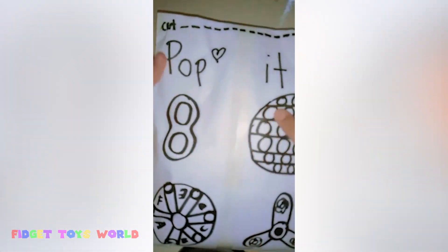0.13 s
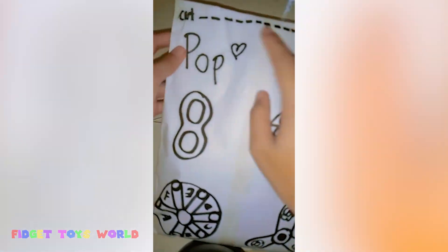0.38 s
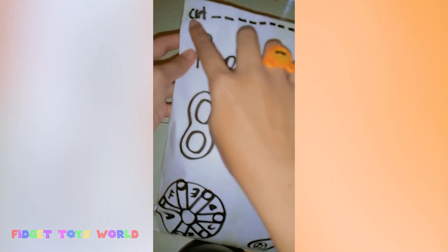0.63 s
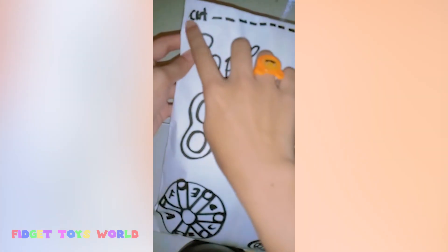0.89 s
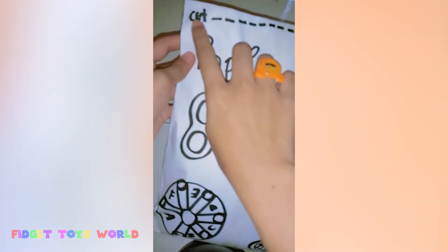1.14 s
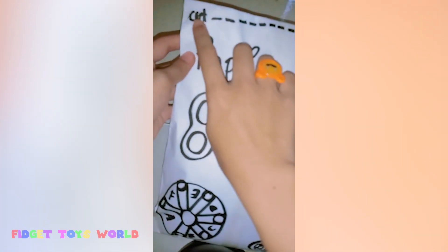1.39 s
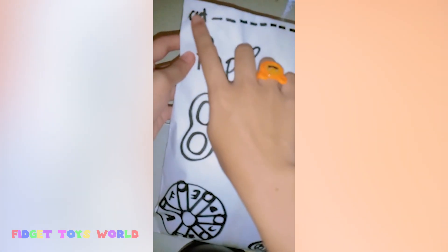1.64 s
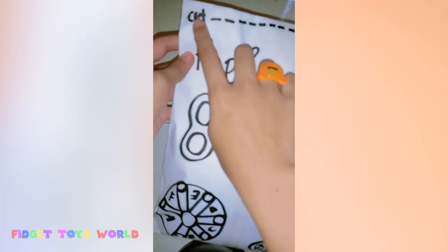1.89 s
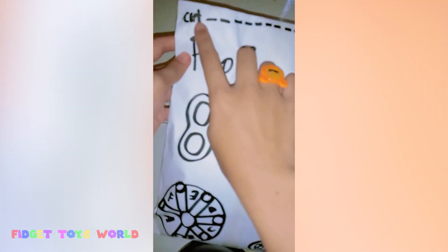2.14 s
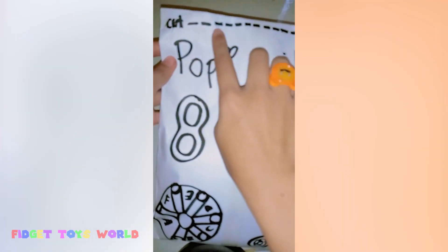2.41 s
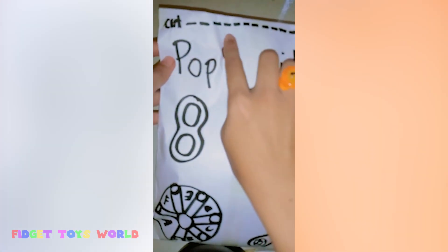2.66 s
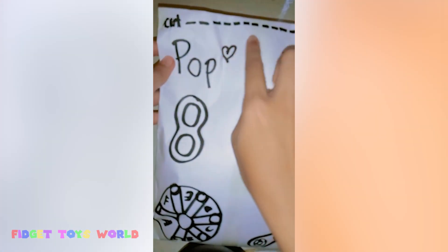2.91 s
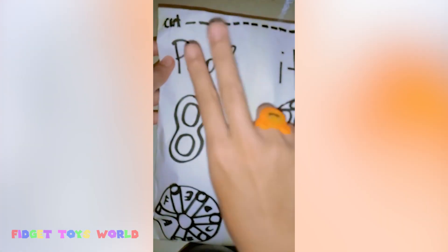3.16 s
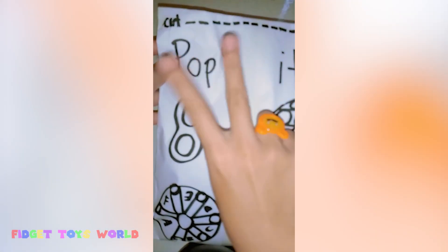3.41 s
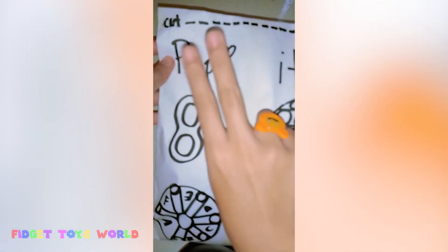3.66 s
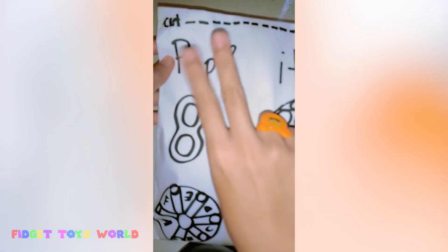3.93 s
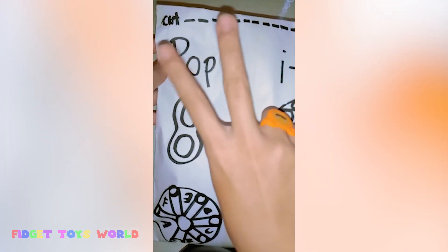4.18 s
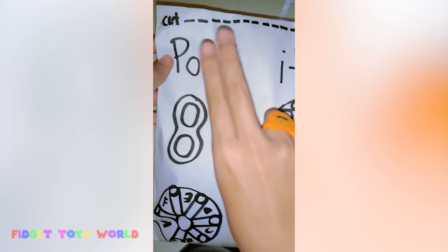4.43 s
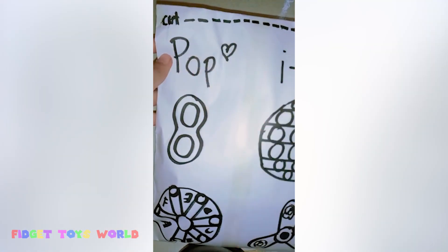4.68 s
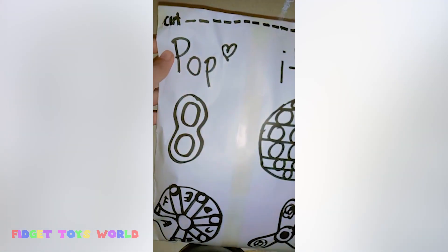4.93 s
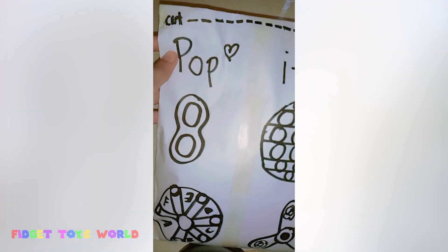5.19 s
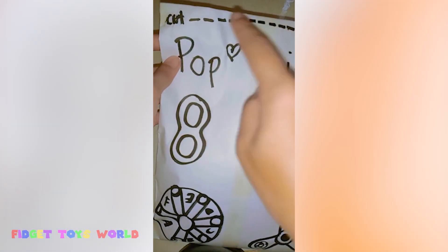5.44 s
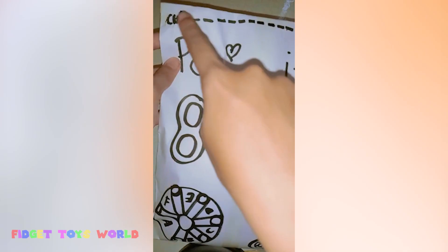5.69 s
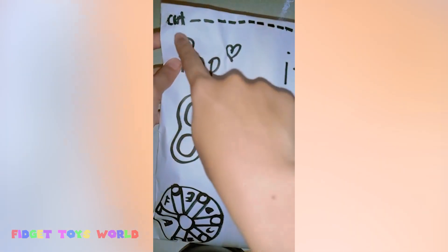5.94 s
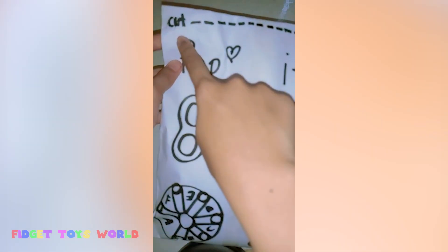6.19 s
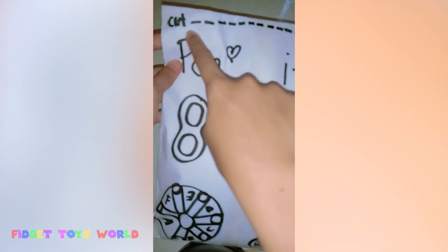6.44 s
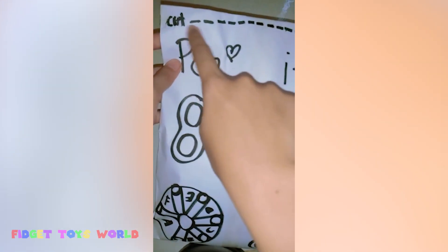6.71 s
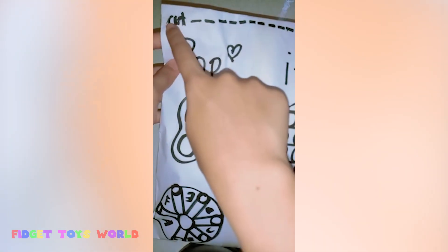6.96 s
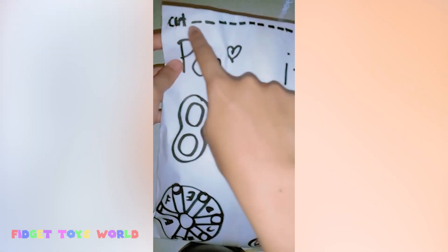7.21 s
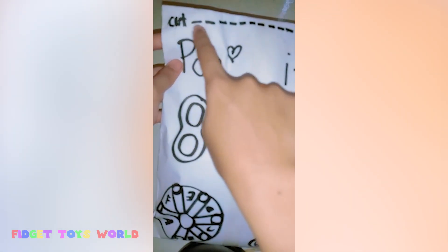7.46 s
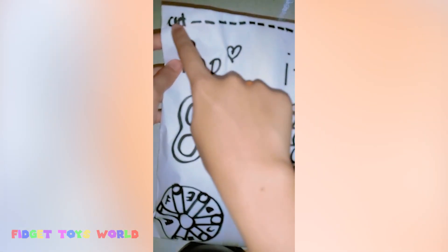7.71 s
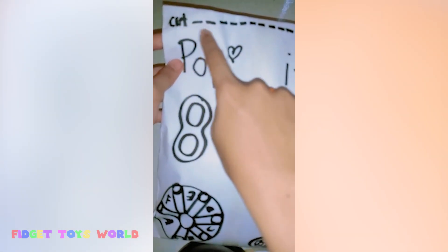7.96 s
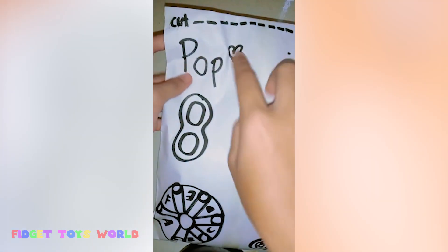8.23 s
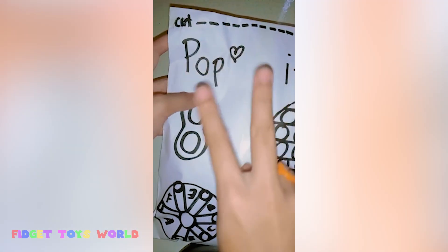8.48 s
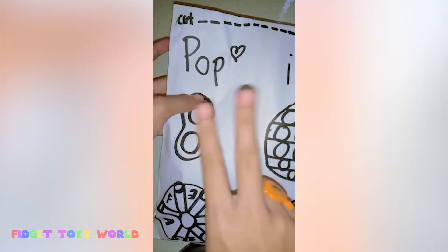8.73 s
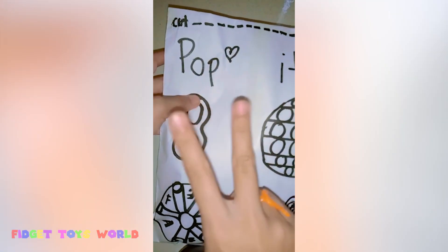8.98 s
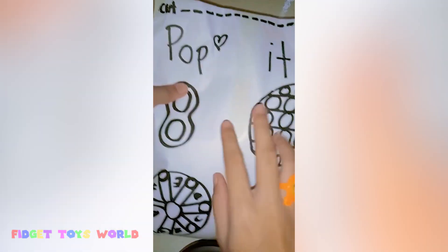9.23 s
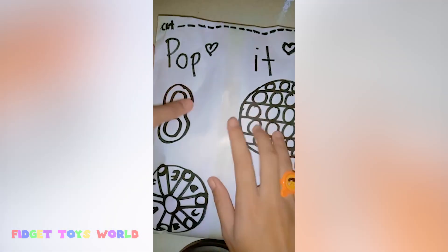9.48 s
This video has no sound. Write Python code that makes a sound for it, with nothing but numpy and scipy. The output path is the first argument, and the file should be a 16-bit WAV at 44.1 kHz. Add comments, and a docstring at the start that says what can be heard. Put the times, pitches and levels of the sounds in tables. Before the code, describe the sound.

Stiff paper is handled very close to a phone microphone in a small, dry room. From 0 to 0.7 s it buckles in dense, loud, irregular crackles, with sharp snaps, bright ticks and low papery thuds. From 0.7 to 2.4 s this thins to scattered fingertip taps with a few stronger snaps near 0.95, 1.2 and 2.0 s. Soft rustling strokes run around 2.2 to 3.2 s, then it is almost quiet until 5.4 s, leaving a faint wavering low machine hum and light hiss. Firm, hollow taps cluster from 5.4 to 6.3 s; at 5.54 s something small and metallic rings faintly further away, fading within a second. From 6.4 to 8.2 s light raspy finger strokes slide over the sheet, with occasional snaps near 7.05 and 7.85 s. Taps and crinkles increase from 8.26 s, ending in a loud crackling burst at 9.3 to 9.6 s.

```python
"""A fingertip taps, strokes and buckles stiff paper held just under a phone; a machine hums through faint hiss.
Dense crackling opens the scene, thins after 0.7 s into scattered taps, strokes and a quiet stretch.
Firm taps return at 5.4 s, something small rings further off at 5.54 s, strokes follow, then crackling ends it.
Each blow sums a swinging thud, a noise-driven ringing snap and a bright tick; strokes are shaped noise and grit."""
import sys
import numpy as np
from scipy import signal
from scipy.fft import rfft, irfft
from scipy.io import wavfile
from scipy.ndimage import uniform_filter1d, map_coordinates

SR = 44100
rng = np.random.default_rng(int(sys.argv[2]) if len(sys.argv) > 2 else 0)


def level_to_linear(level):
    """Convert decibel levels to linear amplitude factors, elementwise."""
    exponent = np.asarray(level, float) / 20
    return 10 ** exponent


def pcm_store(signal):
    """Save signal as 16-bit PCM."""
    levels = np.round(np.clip(np.atleast_2d(signal), -1, 1) * 32767)
    wavfile.write(sys.argv[1], SR, levels.astype(np.int16).T)


N = 423801
T = np.arange(N) / SR

# fingertip lands, the thud leads: time_s, thud_peak_db, thud_pitch_hz, snap_peak_db, tick_peak_db
FINGER_TAPS = [(.341, -23, 382, -25, -24), (.46, -19, 258, -24, -53), (.708, -26, 157, -25.5, -29),
               (.722, -13, 221, -11.5, -20), (0.864, -35.5, 142, -37, -77), (1.062, -31, 165, -43, -39.5),
               (1.247, -16.5, 243, -26, -37), (1.35, -62.5, 155, -63, -44.5), (1.516, -33, 345, -65.5, -41),
               (1.544, -43, 302, -42, -69), (1.702, -36.5, 145, -53, -40),
               (1.863, -46.5, 161, -60.5, -47.5), (2.047, -29, 220, -39.5, -33),
               (2.094, -23, 307, -51, -57), (2.185, -32, 158, -60, -54.5), (2.21, -30.5, 210, -46, -46),
               (3.086, -33, 167, -41, -44), (3.188, -35.5, 150.3, -46, -46),
               (5.429, -18, 213.8, -27.5, -24.5), (5.503, -20, 222, -26.5, -27.5),
               (5.544, -29, 250, -32.5, -41), (5.607, -22, 224, -49, -51), (5.741, -18.5, 246, -20, -33),
               (5.77, -15.5, 282, -25, -38.5), (6.025, -17.5, 263, -17.5, -33),
               (6.056, -21, 230, -61.5, -42.5), (6.284, -14.5, 257, -14.5, -26.5),
               (6.888, -30, 208.7, -42, -49), (7.029, -30.5, 149, -38, -36.5),
               (8.261, -18.5, 179, -17, -22), (8.811, -28.5, 230, -30.5, -56),
               (8.953, -22, 207, -58.5, -72), (9.058, -31.5, 404, -27.5, -58),
               (9.109, -30.5, 321, -47, -59), (9.128, -33, 260, -53.5, -67.5),
               (9.142, -29, 265, -55, -65.5), (9.165, -33, 240, -64, -40.5),
               (9.333, -15.5, 285, -17.5, -38.5), (9.417, -21.5, 350, -14, -52.5)]
# sheet buckles, the snap leads: time_s, snap_peak_db, snap_pitch_hz, thud_peak_db, tick_peak_db
SHEET_BUCKLES = [(.003, -15.5, 580, -20, -41), (0.051, -18, 900, -16.5, -18.5), (.073, -19, 750, -25, -50),
                 (0.098, -9.5, 1120, -17.5, -34), (.107, -14, 730, -34, -33),
                 (0.154, -10, 1560, -27.5, -11.5), (0.215, -30, 1001, -51, -51),
                 (.262, -12, 1770, -35, -31), (0.27, -4.5, 1140, -27, -13.5), (.302, -18, 520, -26, -35),
                 (.323, -14.5, 865, -24.5, -36), (0.378, -9, 750, -21, -7), (.404, -5, 1110, -35, -15),
                 (.429, -22.5, 1220, -33, -42), (0.474, -17, 890, -26, -47), (0.498, -40, 895, -43, -37),
                 (.516, -19.5, 792, -24, -35), (.536, -13.5, 1340, -27, -18),
                 (.609, -24.5, 1390, -28.5, -32), (.63, -12.5, 1830, -24.5, -15.5),
                 (.666, -32, 845, -31.5, -38), (0.676, -26.5, 895, -30.5, -25), (0.682, -11, 840, -34, -13),
                 (.945, -13, 1206, -23, -46.5), (1.036, -37, 750, -52, -70), (1.091, -45, 590, -35.5, -46),
                 (1.171, -14, 517, -19, -17), (1.284, -42.5, 570, -40, -67), (1.405, -56.5, 650, -61, -63),
                 (1.575, -48, 557, -51, -61), (2.02, -12.5, 1000, -14.5, -30),
                 (2.254, -22.5, 590, -25.5, -19), (2.334, -19.5, 850, -49.5, -27),
                 (3.64, -52, 1344, -44, -66.5), (3.77, -45.5, 704, -59.5, -68.5),
                 (4.271, -44.5, 599, -60, -54.5), (4.644, -30.5, 1100, -41, -25.5),
                 (4.8, -61, 805, -51, -54), (5.484, -56, 1500, -42, -37.5), (7.051, -18, 990, -29.5, -18),
                 (7.855, -16, 925, -31, -10.5), (8.309, -23, 815, -27, -21.5), (8.36, -30.5, 536, -38, -30),
                 (8.413, -18, 1140, -25.5, -29.5), (8.59, -37, 1810, -52, -30.5),
                 (8.763, -21, 700, -23, -56.5), (9.061, -29.5, 1720, -40, -58),
                 (9.365, -31, 1900, -50, -36.5), (9.44, -21, 580, -34, -39), (9.455, -21, 890, -28.5, -25),
                 (9.461, -17, 900, -22, -31), (9.506, -9, 1230, -23.5, -45),
                 (9.51, -12.5, 1330, -16.5, -50), (9.544, -15, 1130, -17.5, -37),
                 (9.553, -6.5, 1000, -19, -10.5), (9.596, -23, 800, -24, -35), (9.599, -5, 1250, -22, -2)]


def peak(x, db):
    """Scale to a peak level."""
    return x * level_to_linear(db) / np.abs(x).max()


def unit(x):
    """Scale to rms 1."""
    return x / np.sqrt(np.mean(x ** 2))


def colour(x, points):
    """Shape the spectrum by (Hz, dB) points, then scale to rms 1."""
    hz, db = np.transpose(points)
    f = np.fft.rfftfreq(len(x), 1 / SR) + 1
    gain = level_to_linear(np.interp(np.log(f), np.log(hz), db))
    return unit(irfft(rfft(x) * gain, len(x)))


def band(x, lo_hz, hi_hz):
    """Causal band-pass."""
    return signal.sosfilt(signal.butter(2, [lo_hz, hi_hz], "bandpass", fs=SR, output="sos"), x)


def resonate(x, hz, width_hz):
    """One resonance, gain 1 at its centre."""
    return signal.lfilter(*signal.iirpeak(hz, hz / width_hz, fs=SR), x)


def walk(rate_hz):
    """Random levels held 1 / rate_hz and slewed twice; standard deviation about 1.3."""
    k = int(SR / rate_hz)
    held = np.repeat(rng.standard_normal(N // k + 1), k)
    return 1.8 * uniform_filter1d(uniform_filter1d(held, k), k)[:N]


def grit(per_s, spread_db):
    """Random clicks; a few are far stronger than the rest."""
    noise, draw, size = rng.standard_normal(N), rng.random(N), rng.exponential(size=N)
    return noise * (draw < per_s / SR) * level_to_linear(spread_db * np.minimum(size, 2.5))


def add(track, time_s, sound):
    """Mix a sound into the track at time_s."""
    i = max(int(time_s * SR), 0)
    track[i:i + len(sound)] += sound[:N - i]


def blows():
    """Taps share a snap pitch, buckles a thud pitch; rows of time, snap dB, Hz, thud dB, Hz, tick dB."""
    tap_snap_hz, buckle_thud_hz = 486, 294
    taps = [(s, snap_db, tap_snap_hz, thud_db, thud_hz, tick_db)
            for s, thud_db, thud_hz, snap_db, tick_db in FINGER_TAPS]
    buckles = [(s, snap_db, snap_hz, thud_db, buckle_thud_hz, tick_db)
               for s, snap_db, snap_hz, thud_db, tick_db in SHEET_BUCKLES]
    return taps + buckles


def thud_sound(t, flutter, thud_hz):
    """The sheet swings about a cycle and a half, sinking in pitch as the finger settles."""
    turns = thud_hz * (t + 0.00055 * (1 - np.exp(-t / 0.00051)))
    swing = np.sin(2 * np.pi * turns) * np.exp(-t * thud_hz / 0.53) * (1 - np.exp(-t / 0.0023))
    return peak(swing, 0) + peak(band(flutter * np.exp(-t / 0.0082), 110, 270), -5.0)


def snap_sound(t, crack, after, snap_hz, snap_db):
    """A crease gives way, then flutters; a weak one gives way slowly and rings purer."""
    slow = 1 + np.clip((-24 - snap_db) / 6, 0, 4)
    give = np.exp(-((t / slow - .0024) / 0.0011) ** 2)
    burst = crack * np.abs(crack) * (give + level_to_linear(-9.0) * after)
    ring = resonate(burst, snap_hz, 0.73 * snap_hz / slow ** 0.46)
    return resonate(ring, snap_hz, 1.3 * snap_hz / slow)


def tick_sound(t, spit, after, tick_db):
    """A faint noise swell around the release, then flutter; faint ticks are thin, hard ones have more body."""
    lead_in = level_to_linear(-13.0) * np.exp(-((t - .0015) / 0.005) ** 2)
    release = np.exp(-((t - .0024) / 0.00082) ** 2)
    tick = band(spit * np.abs(spit) * (lead_in + release + level_to_linear(-12.5) * after), 1600, 7300)
    tick = tick + level_to_linear(2.5 + 0.36 * tick_db) * resonate(tick, 2100, 2000)
    return tick + level_to_linear(-13.5 - 0.24 * tick_db) * resonate(tick, 5900, 1500)


def hits():
    """A push rocks the whole sheet, a crease lets go in a few ms and its flutter dies away."""
    hit_samples = 4096
    out, t = np.zeros(N), T[:hit_samples]
    after = (1 - np.exp(-t / 0.00077)) * np.exp(-t / 0.0053)
    for s, snap_db, snap_hz, thud_db, thud_hz, tick_db in blows():
        crack, flutter, spit = rng.standard_normal((3, hit_samples))
        thud = peak(thud_sound(t, flutter, thud_hz), thud_db)
        snap = peak(snap_sound(t, crack, after, snap_hz, snap_db), snap_db)
        tick = peak(tick_sound(t, spit, after, tick_db), tick_db)
        add(out, s - .0006, thud + snap + tick)
    return out


def settling():
    """After every blow the sheet rustles on briefly: a short fading stroke."""
    delay_s, end_after_s, fade_db = 0.0046, 0.042, -22.5
    # rustle against the tap's tick or the buckle's snap, hiss against either tick
    tap_rustle_db, buckle_rustle_db, settle_hiss_db = -19, -23.5, -36
    rasp_db = -0.5  # against the mean of rustle and hiss
    rustle = [(s, tick_db + tap_rustle_db, tick_db) for s, *_, tick_db in FINGER_TAPS]
    rustle += [(s, snap_db + buckle_rustle_db, tick_db) for s, snap_db, *_, tick_db in SHEET_BUCKLES]
    rows = []
    for s, db, tick_db in rustle:
        hiss_db = tick_db + settle_hiss_db
        rows.append((s + delay_s, s + end_after_s, db, (db + hiss_db) / 2 + rasp_db, hiss_db, fade_db))
    return rows


def pressure(start_s, end_s, first_db, swell_db):
    """Gain over time: every stroke starts, swells or fades, lets go and settles; overlaps add in power."""
    out = np.zeros(N)
    for start, end, db, swell in zip(start_s, end_s, first_db, swell_db):
        i = int(max(start - .1, 0) * SR)
        t = T[i:int((end + .2) * SR)]
        onset_s = 0.0054 + 0.00054 * max(swell, 0)  # a stroke that swells also starts gently
        onset = np.exp(np.minimum(t - start, 0) / onset_s)
        since = np.maximum(t - end, 0)
        release = .75 * np.exp(-since / .006) + .25 * np.exp(-since / .025)
        level = level_to_linear(np.interp(t, [start, end], [db, db + swell]))
        out[i:i + len(t)] += (onset * release * level) ** 2
    return np.sqrt(out)


def bending(x, depth_db, cell_hz, cell_s):
    """The sheet's resonances come and go as it bends: a slow random gain over time and frequency."""
    hz, s, z = signal.stft(x, SR, nperseg=512)
    field = rng.standard_normal((200, 1000))
    stiff = 1 / (1 + hz[:, None] / 9000)  # the treble is coloured less
    cells = np.meshgrid(hz / cell_hz, s / cell_s, indexing="ij")
    gain = level_to_linear(depth_db * stiff * map_coordinates(field, cells, order=1))
    return signal.istft(z * unit(gain), SR)[1][:N]


def paper(push, scrape, slide):
    """Pushing bends the sheet (rustle, creases, thumps), the nail rasps, sliding skin hisses on the fibres."""
    # spectra: pitch_hz, relative_level_db
    rustle_points = [(150, -28.5), (250, -4.5), (630, -2.5), (800, -0.5), (1300, -6.5), (2000, -11.5),
                     (4000, -50)]
    rasp_points = [(700, -24), (1400, -5.5), (1950, 0), (2800, -5.5), (3700, -7), (4800, -10),
                   (5500, -21.5)]
    hiss_points = [(2500, -32.5), (3500, -9), (4600, -4.5), (5300, -1), (5900, 1), (6500, -2.5),
                   (6700, -6.5), (7600, -10.5), (9900, -55.5)]
    # the table under the sheet cancels a few bands of the rubbing: centre_hz, width_hz, share_removed (0-1)
    notches = [(1780, 260, .75), (3280, 330, .85), (4300, 300, .55)]
    effort = np.clip(push / level_to_linear(-35), 0, 1) ** 1.6
    creases = unit(signal.lfilter([1], [1, -.985], grit(220, 2.5) ** 2) ** .5)
    grain = (1 - 0.77 * effort) * level_to_linear(2.2 * walk(30)) + 0.89 * effort * creases
    rustle = push * colour(grain * rng.standard_normal(N), rustle_points)
    # the treble follows the creases less
    fibres = level_to_linear(1.3 * walk(60)) * (1 - 0.21 * effort + 0.44 * effort * creases)
    rasp = scrape * colour(fibres * grit(3000, 2.1), rasp_points)
    hiss = slide * colour(fibres * grit(6000, 2.0), hiss_points)
    rub = rasp + hiss
    for hz, width_hz, share in notches:
        rub = rub - share * resonate(rub, hz, width_hz)
    # tiny creases pop at random, each ringing its own patch of the sheet
    pops = sum(unit(resonate(grit(40, 4.0), hz, 0.33 * hz)) for hz in (451.2, 750, 1200, 1900))
    rustle = rustle + level_to_linear(-9.0) * push * effort ** 0.25 * pops
    rumble = unit(band(rng.standard_normal(N), 60, 230))
    thump = push * effort ** 0.14 * rumble * level_to_linear(-1.0 + 2.0 * walk(18))
    bent_rustle = bending(rustle, depth_db=6, cell_hz=130, cell_s=.07)
    bent_rub = bending(rub, depth_db=5.5, cell_hz=100, cell_s=.1)
    return bent_rustle + bent_rub + thump


def strokes():
    """Strokes and settling drive the paper; the skin stops sliding a little before the finger lets go."""
    # strokes and handling: start_s, end_s, first_rustle_db, first_rasp_db, first_hiss_db, swell_to_end_db
    handling = [(0.049, 0.147, -33.5, -39, -54, -15.5), (0.159, 0.246, -61, -67, -88, 19),
                (0.272, 0.423, -40.5, -46.5, -57.5, 8.5), (0.439, 0.55, -40, -50.5, -63, 12.5),
                (0.559, 0.666, -46, -43.5, -48.5, -7), (0.684, 0.792, -36.5, -39.5, -50, -13.5),
                (0.881, 0.948, -65.5, -71.5, -74.5, 15.5), (1.047, 1.125, -56.5, -63.5, -70.5, -7),
                (1.182, 1.218, -37.5, -44, -53.5, -14), (1.281, 1.308, -52, -75, -81, -13),
                (1.527, 1.597, -67, -80.5, -83, -10.5), (1.716, 1.777, -59, -71.5, -81.5, -9),
                (2.192, 2.249, -59.5, -75, -79.5, 5), (2.262, 2.34, -55, -55.5, -62.5, 6),
                (2.343, 2.499, -50, -48, -56.5, 0), (2.507, 2.626, -50, -46, -54.5, -11.5),
                (2.801, 2.892, -70.5, -78.5, -96.5, 13.5), (2.894, 3.106, -46, -52, -65.5, -4),
                (3.193, 3.254, -44, -48.5, -60, 1.5), (4.252, 4.298, -63, -67.5, -70, 4),
                (4.624, 4.706, -62, -66, -80, 3.5), (4.801, 4.818, -86, -68, -76.5, -7),
                (4.908, 4.97, -72, -78.5, -77, -6.5), (5.023, 5.081, -61, -66, -62, -15),
                (5.294, 5.351, -67, -58, -77, 5), (5.507, 5.569, -51, -46, -56.5, -13),
                (5.682, 5.7, -73, -73, -64, 8), (6.188, 6.216, -67.5, -72.5, -84, 9.5),
                (6.449, 6.469, -60.5, -59, -57, -0.5), (6.567, 6.734, -58.5, -51, -53.5, -5.5),
                (6.897, 6.959, -55, -52, -51.5, -6), (7.035, 7.115, -52.5, -56, -53, -16),
                (7.213, 7.499, -64.5, -56, -58, -0.5), (7.513, 7.603, -68, -74, -78, -11),
                (7.636, 7.825, -63, -53, -53.5, -5.5), (7.88, 7.928, -63.5, -54.5, -52, -7),
                (7.947, 8.101, -66, -61.5, -63.5, 5.5), (8.106, 8.254, -56, -55, -58.5, 3),
                (8.266, 8.364, -46, -41.5, -50.5, -3), (8.419, 8.529, -42.5, -47, -46, -15),
                (8.577, 8.691, -49.5, -50.5, -59, -11), (8.707, 8.766, -52.5, -53, -69, 4),
                (8.967, 9.06, -65, -55, -78, -0.5), (9.083, 9.163, -53.5, -54, -78, 7.5),
                (9.26, 9.4, -60.5, -51, -71.5, 14), (9.405, 9.45, -48.5, -39.5, -56, -1.5),
                (9.454, 9.537, -37.5, -35.5, -52, -2.5), (9.548, 9.609, -41, -56, -61, -1.5)]
    hiss_stops_s = 0.01
    hiss_swell = 1.2  # times the dB swell of the rustle
    start_s, end_s, rustle_db, rasp_db, hiss_db, swell_db = np.transpose(handling + settling())
    slide_end_s = np.maximum(end_s - hiss_stops_s, start_s + .005)
    push = pressure(start_s, end_s, rustle_db, swell_db)
    scrape = pressure(start_s, end_s, rasp_db, swell_db)
    slide = pressure(start_s, slide_end_s, hiss_db, hiss_swell * swell_db)
    return paper(push, scrape, slide)


def room(x, t60_s, wet_db):
    """A short diffuse tail from the table and walls."""
    t = T[:SR // 2]
    tail = rng.standard_normal(len(t)) * level_to_linear(-60 * t / t60_s) * (t > .004)
    return x + level_to_linear(wet_db) * signal.fftconvolve(x, tail / np.linalg.norm(tail))[:N]


def noise_band(hz, width_hz):
    """Noise through two equal resonances, rms 1."""
    return unit(resonate(resonate(rng.standard_normal(N), hz, width_hz), hz, width_hz))


def far_ring():
    """A few rough partials, each a narrow noise band, swell fast and fade."""
    # pitch_hz, width_hz, rms_db before swell and decay, t60_s
    partials = [(2600, 50, -62, .8), (2650, 60, -63, .9), (3010, 55, -58, 1), (3070, 60, -57, .85),
                (3510, 70, -71, .7), (3960, 110, -68, .6)]
    start_s = 5.54
    t = np.maximum(T - start_s, 0)
    swell = 1 - np.exp(-t / .012)
    return sum(level_to_linear(db - 60 * t / t60_s) * swell * noise_band(hz, width_hz)
               for hz, width_hz, db, t60_s in partials)


def hum():
    """Narrow noise bands and slowly wavering tones of a machine somewhere in the room."""
    # hum bands: pitch_hz, width_hz, relative_level_db
    hum_bands = [(39.6, 20, -10), (66.43, 2.8, -2), (70.55, 4.8, 1.5), (98.86, 13, -8), (112, 29, -3),
                 (147.15, 60, -2), (176.7, 8, -9.5), (210, 6.6, -9)]
    # motor tones: multiple_of_shaft_speed, level_db against the summed bands
    motor = [(2, -14.5), (4, -10), (5, -11.5), (6, -7.5), (10, -25), (14, -28.5)]
    # hum level over time, with brief dips: time_s, level_db
    hum_level = [(.8, -60), (.92, -48.5), (1.8, -53.5), (2.4, -51.5), (2.72, -60), (2.9, -52), (4.2, -54),
                 (4.7, -48.5), (5.75, -51.5), (5.92, -49), (6.1, -65.5), (6.2, -49), (6.9, -48),
                 (7.1, -52.5), (7.3, -48.5), (8.38, -51), (8.92, -59)]
    shaft_hz = 29.6
    bands = sum(level_to_linear(db) * noise_band(hz, width_hz) for hz, width_hz, db in hum_bands)
    turn = 2 * np.pi * shaft_hz * T
    tones = np.zeros(N)
    for k, db in motor:
        tone = np.sqrt(2) * np.sin(round(k) * turn + 2 * np.pi * rng.random())
        tones += level_to_linear(db + 1.5 * walk(2.5)) * tone
    return level_to_linear(np.interp(T, *np.transpose(hum_level))) * (unit(bands) + tones)


def room_hiss():
    """Steady shaped noise fills the room."""
    # pitch_hz, relative_level_db
    air_points = [(140, -37.5), (230, -0.5), (419, -8.5), (471, -14), (530, -9.5), (1240, -17),
                  (6090, -29.5), (7590, -49), (9870, -80.5), (16700, -120)]
    rms_db = -70.5
    return level_to_linear(rms_db) * colour(rng.standard_normal(N), air_points)


def scene():
    """Paper close by, room behind."""
    sheet = hits() + strokes()
    return (room(sheet, t60_s=0.11, wet_db=-24.0) + far_ring() + hum() + room_hiss())[None]


def top_cut(x):
    """Nothing passes above the cut-off."""
    return signal.sosfilt(signal.butter(12, 11990, fs=SR, output="sos"), x)


def record(dry):
    """The phone drops deep bass, lifts 6 kHz, falls steeply above it, adds faint hiss, clips at full scale."""
    thin = signal.sosfilt(signal.butter(2, 48, "highpass", fs=SR, output="sos"), dry)
    lifted = thin + level_to_linear(-4.0) * resonate(thin, 6070, 1100)
    narrow = signal.sosfilt(signal.butter(10, 6700, fs=SR, output="sos"), lifted)
    narrow = signal.sosfilt(signal.butter(12, 7500, fs=SR, output="sos"), narrow)
    leaky = narrow + level_to_linear(-44.0) * thin  # a little full-band sound gets past the low-pass
    hissy = leaky + level_to_linear(-87.5) * rng.standard_normal(dry.shape)
    return top_cut(np.clip(hissy, -1, 1))


dry = scene()
out = record(dry)
pcm_store(out)
```